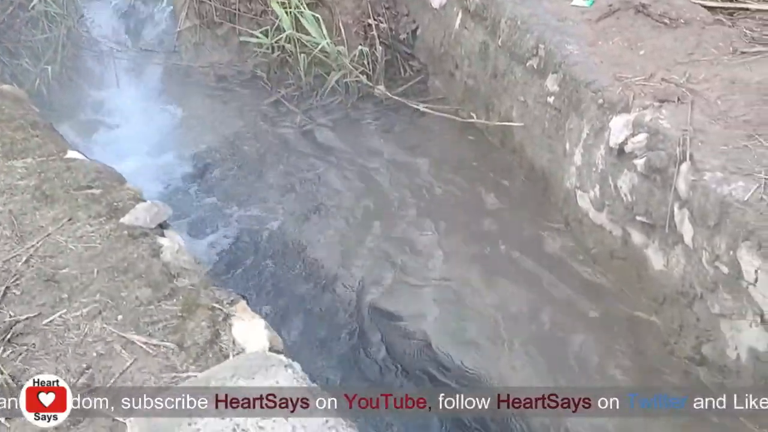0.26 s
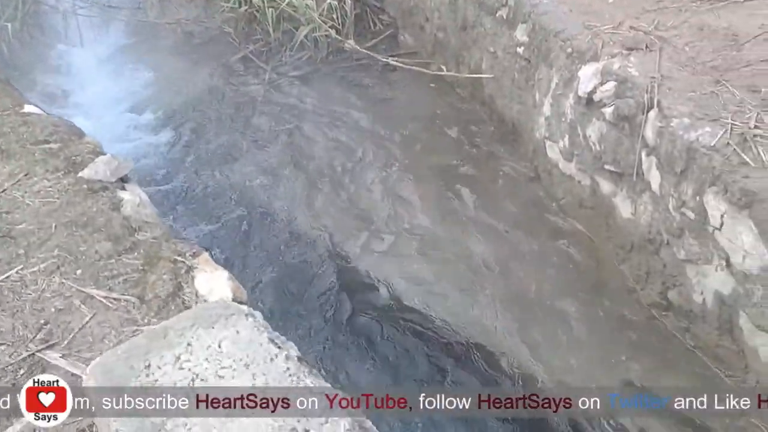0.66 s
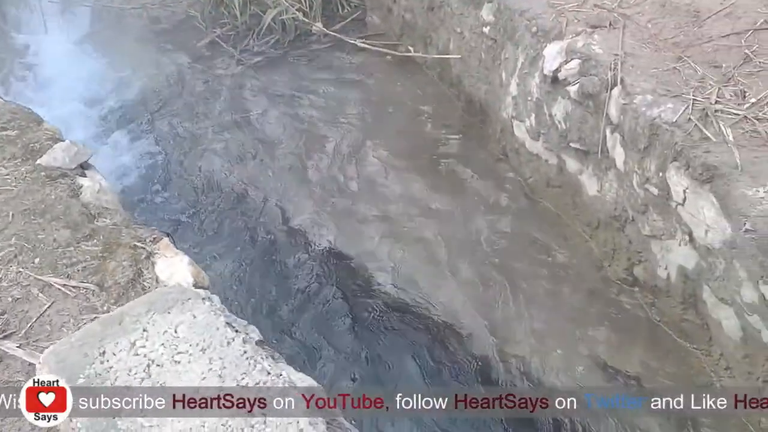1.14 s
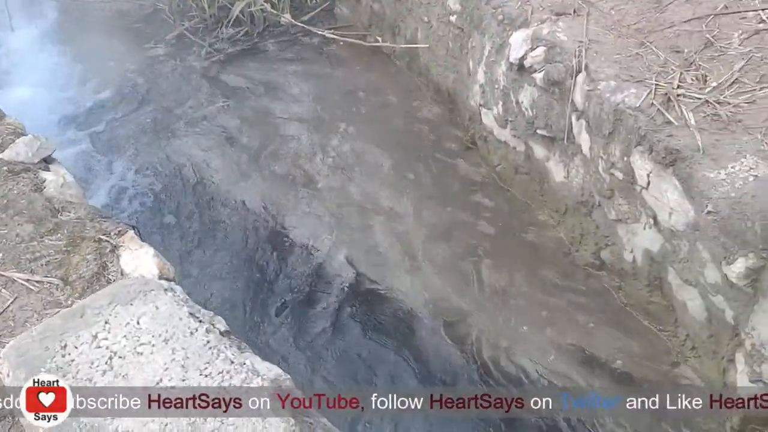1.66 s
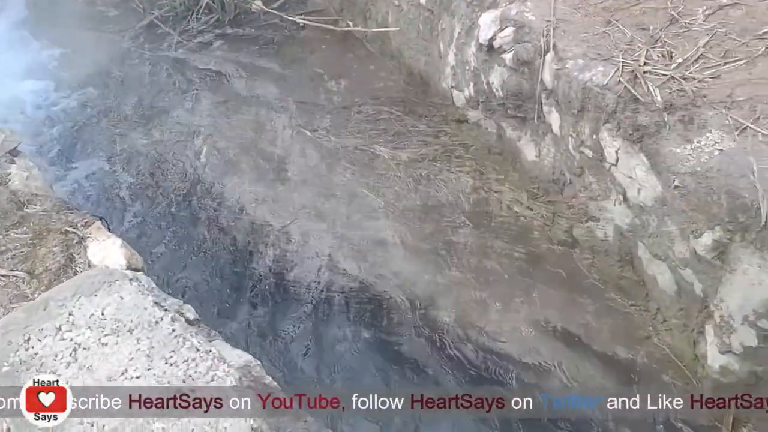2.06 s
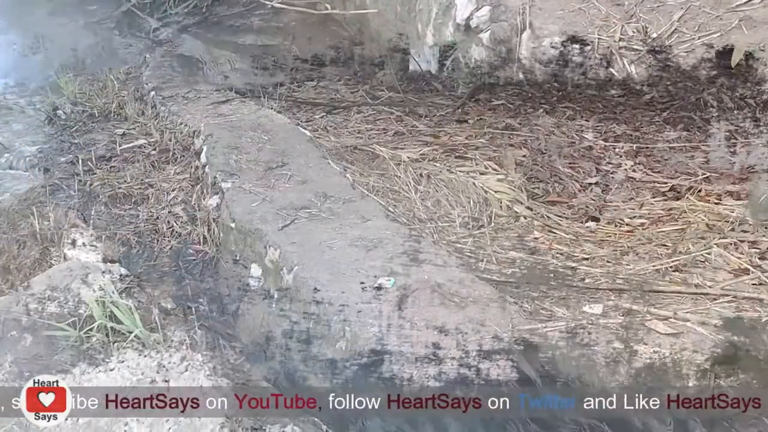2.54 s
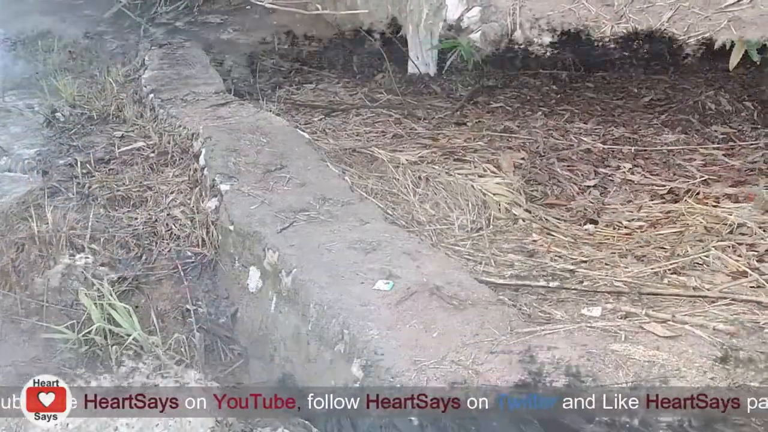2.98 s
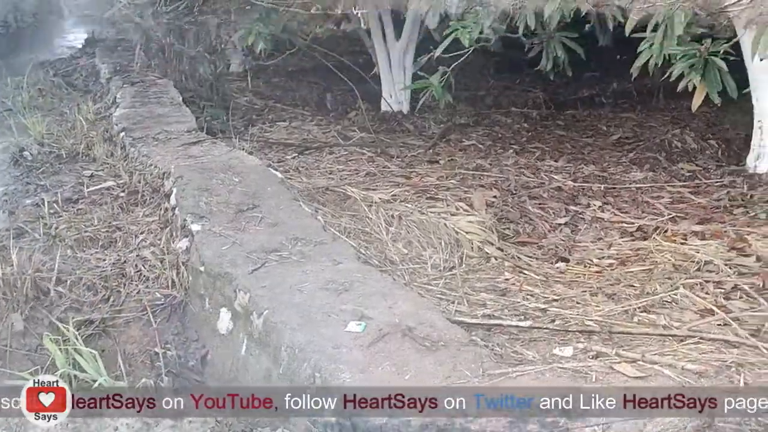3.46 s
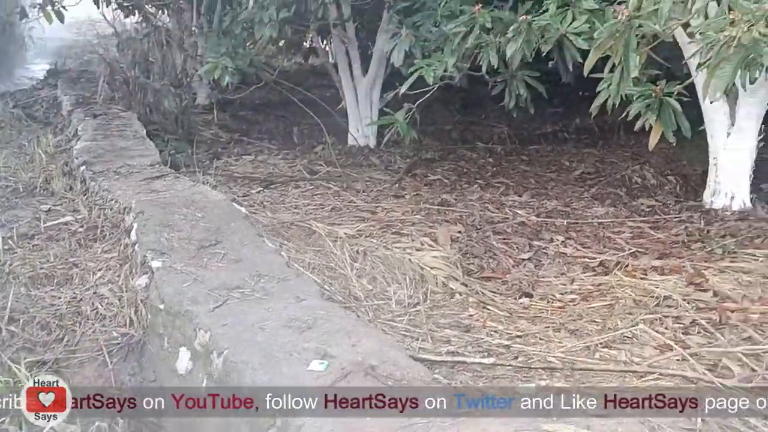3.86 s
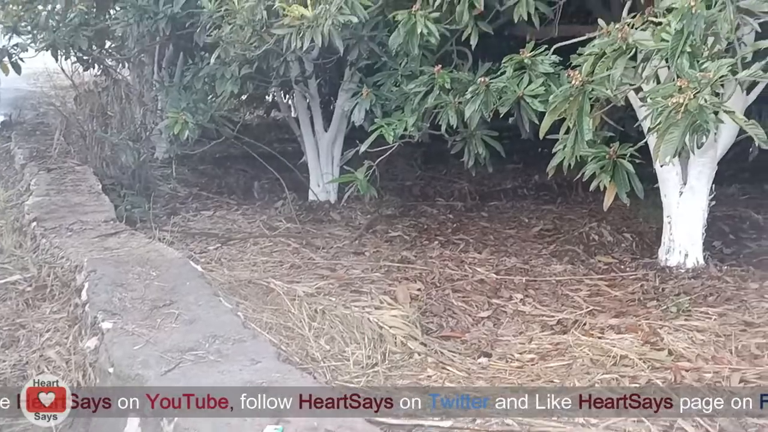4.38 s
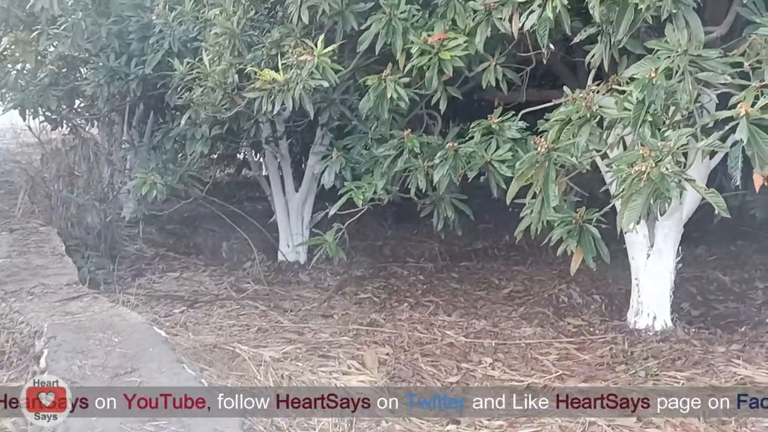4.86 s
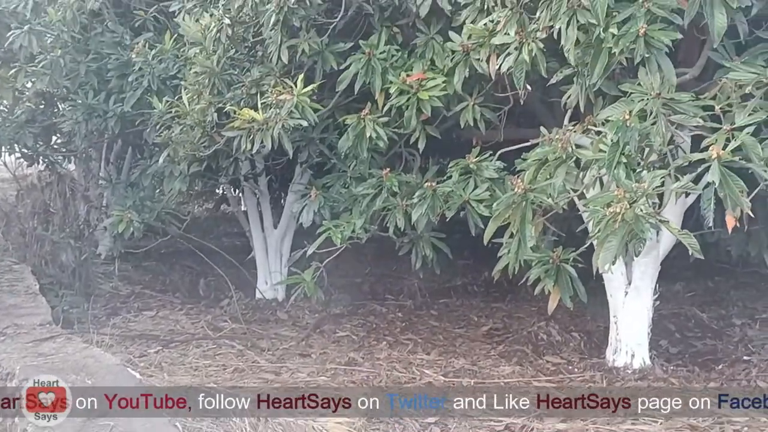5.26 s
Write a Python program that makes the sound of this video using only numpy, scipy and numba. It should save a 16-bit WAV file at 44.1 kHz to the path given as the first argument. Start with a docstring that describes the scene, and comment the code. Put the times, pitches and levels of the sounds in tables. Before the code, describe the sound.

A steady churning stream with bubbling plops and tiny splashes stops dead for a quarter second, then swells up again, slightly duller.

```python
"""Water rushes down a narrow stone channel, first heard from right over it: a churning rush of noise bands,
swarms of ringing bubbles, larger ones plopping out and flung drops ticking. A hard cut brings a short silence.
Then the same stream fades in from the bank, the listener turning away, with plops and ticks as before.
At both places the stone sends back echoes about two milliseconds late, which ripple the colour."""
import sys
import numpy as np
from scipy import signal
from scipy.fft import rfft, irfft
from scipy.io import wavfile
from scipy.ndimage import map_coordinates
from numba import njit

SR = 44100
rng = np.random.default_rng(int(sys.argv[2]) if len(sys.argv) > 2 else 0)


def persist_wave(psi):
    """Save psi, clipped to +-1, as 16-bit WAV."""
    counts = np.round(np.clip(psi, -1, 1) * 32767).astype(np.int16)
    wavfile.write(sys.argv[1], SR, np.atleast_2d(counts).T)


def rack_gain(trim_db):
    """Turn a fader trim in dB into the linear factor to multiply a signal by."""
    fader = np.asarray(trim_db, float)
    return 10 ** (fader / 20)


N = 243873
HZ = np.fft.rfftfreq(N, 1 / SR)
TIME = np.arange(N) / SR


def rms_one(x):
    """Scales a sound to an rms of 1."""
    return x / np.sqrt(np.mean(x ** 2) + 1e-20)


def coloured(x, points):
    """Weights the spectrum by a (f/Hz, level/dB) table; next to nothing passes outside it."""
    hz, db = np.transpose(points)
    weight_db = np.interp(np.log(HZ + 1), np.log(hz), db, left=-80, right=-120)
    return irfft(rfft(x) * rack_gain(weight_db), N)


def between(x, low_hz, high_hz):
    """Band-pass without delay."""
    low_edge = 1 + (low_hz / (HZ + 1)) ** 8
    high_edge = 1 + (HZ / high_hz) ** 8
    return irfft(rfft(x) / low_edge / high_edge, N)


def drift(rate_hz):
    """Slow chance of spread 1: noise twice through a one-pole low-pass at rate_hz."""
    hop = 20  # computed at every 20th sample
    r = np.exp(-2 * np.pi * rate_hz * hop / SR)
    noise = rng.standard_normal(N // hop + 2002)
    slow = signal.lfilter([1], [1, -2 * r, r * r], noise)[2000:]  # settled part only
    return np.interp(np.arange(N) / hop, np.arange(len(slow)), rms_one(slow - slow.mean()))


@njit
def add_bubbles(out, centre_s, height, hz, length_s, phase, rise, sr):
    """A bubble swells and dies, length_s wide at half height; its pitch climbs as it nears the surface."""
    for k in range(len(hz)):
        span = int(2 * length_s[k] * sr)
        first = int(centre_s[k] * sr) - span // 2
        turn = phase[k]
        for i in range(max(0, -first), min(span, len(out) - first)):
            u = i / span
            turn += 2 * np.pi * hz[k] * (1 + rise[k] * (u - .5)) / sr
            out[first + i] += height[k] * np.sin(np.pi * u) ** 2 * np.sin(turn)


def rush(together_db, patchy_db, surge):
    """Churning water: third-octave bands of noise, even per Hz, heaving together and flickering alone."""
    out = np.zeros(N)
    edges = 20 * 2 ** np.arange(0, 9.1, 1 / 3)  # Hz
    white = rng.standard_normal((2, N))
    for k, (low, high) in enumerate(zip(edges, edges[1:])):
        band_pass = signal.butter(2, [low, high], "band", fs=SR, output="sos")
        band = signal.sosfilt(band_pass, white[k % 2])  # neighbours use different noise
        out += band * rack_gain(together_db * surge + patchy_db * drift(25.0))
    return rms_one(out)


def swarm(count, cycles, spread_db, clump, surge):
    """Ringing bubbles, densest at low pitch, crowd into the surges; a few are much louder."""
    draw = rng.random((count, 6))
    crowd = np.cumsum(np.exp(clump * surge))
    when = np.interp(draw[:, 0], crowd / crowd[-1], TIME)
    hz = 150 + 8200 * draw[:, 1] ** 1.5
    length = cycles * (.5 + draw[:, 2]) * (hz / 1000) ** .2 / hz
    loudness = rack_gain(-spread_db * np.log(draw[:, 3] + .012))
    # power per Hz stays about even across bubble sizes
    height = loudness * hz ** (1 / 6) / np.sqrt(length)
    out = np.zeros(N)
    add_bubbles(out, when, height, hz, length, 2 * np.pi * draw[:, 4], 0.33 * draw[:, 5], SR)
    return rms_one(out)


def gurgling(water):
    """The deep bubbles come in uneven bouts: the low band swells and sinks by chance."""
    swell_db, bout_hz = 1.94, 4.2  # spread of the swell, and its pace
    return water + (rack_gain(swell_db * drift(bout_hz)) - 1) * between(water, 280, 680)


def plops():
    """Larger bubbles and sharp drops, each at its own moment and pitch, with shorter droplets around it."""
    # the largest bubbles and loudest ticks, before treble edge and echoes:
    # t/s, peak level/dB, f/Hz, length at half height/ms
    large_bubbles = [(0.295, -44, 400, 11.5), (0.3294, -39.5, 454, 8.7), (0.465, -42, 481, 11),
                     (0.5905, -43, 410, 11.8), (0.5270, -42.5, 503, 8), (0.7218, -40.5, 438, 6.7),
                     (0.757, -44.5, 3067, 11), (0.798, -47.5, 3460, 19), (0.8136, -31.5, 475, 7),
                     (0.8305, -41, 466, 14.7), (0.8805, -35.5, 5700, 1.1), (0.9827, -37, 1810, 2.1),
                     (1.1015, -37, 510, 7), (1.3137, -39.5, 3560, 3.7), (1.3421, -38, 496, 5.6),
                     (1.3842, -37.5, 595, 5.8), (1.477, -38.5, 3550, 8.3), (1.523, -35, 2710, 1.5),
                     (1.6771, -33, 1440, 3.4), (1.7365, -33, 1860, 2.1), (1.863, -33, 3070, 1.3),
                     (1.88, -37, 2870, 1.9), (1.9956, -42.5, 263, 18.9), (2.1424, -52, 130, 22),
                     (2.2552, -32, 1820, 3.2), (2.261, -34, 1700, 3.2), (2.2642, -31, 6500, 0.9),
                     (2.2659, -46.5, 152, 19.4), (2.365, -35.5, 1530, 2.2), (2.3731, -34.5, 448, 6.5),
                     (2.3873, -39, 400, 15.7), (2.776, -39.5, 425, 6.2), (3.182, -41, 3130, 1.3),
                     (3.4049, -48, 450, 19.2), (3.5259, -42.5, 585, 8.4), (3.6033, -33, 1990, 3.9),
                     (3.7447, -37.5, 2520, 1.5), (3.791, -39.5, 1120, 6.6), (3.814, -42, 540, 6.9),
                     (3.8833, -49, 161, 22), (3.9707, -35, 6100, 0.6), (4.0148, -38, 3540, 3),
                     (4.2021, -29, 5600, 0.53), (4.222, -35, 458, 11.7), (4.2567, -40.5, 1190, 7.7),
                     (4.7625, -38, 1070, 2.8), (4.768, -47, 150, 17.5), (4.799, -34, 3420, 1.8),
                     (4.8455, -34.5, 1880, 2.3), (4.8882, -32.5, 342, 4.8), (4.9417, -38, 3120, 3.3),
                     (5.0842, -33, 6500, 1.4), (5.2317, -43, 550, 11.8), (5.3824, -41, 488, 18),
                     (5.3824, -41, 249, 21)]
    splash_db, scatter_octaves = -10, 0.35  # droplets: level relative to their bubble, spread of pitch
    when, peak_db, hz, ms = np.transpose(large_bubbles)
    rise = np.full(len(hz), .08)
    out = np.zeros(N)
    add_bubbles(out, when, rack_gain(peak_db), hz, ms / 1000, 2 * np.pi * rng.random(len(hz)), rise, SR)
    draw = rng.standard_normal((len(hz), 3, 3))  # three droplets to each bubble
    for late, off, phase in draw.transpose(1, 2, 0):
        droplet_s = when + late * ms / 1000
        droplet_hz = np.minimum(hz * 2 ** (scatter_octaves * off), 7500)
        add_bubbles(out, droplet_s, rack_gain(peak_db + splash_db), droplet_hz, ms / 2000,
                    2 * np.pi * phase, rise, SR)
    return out


def middling_plops(count):
    """Middling bubbles and drops at random, a few cycles each, at pitches spread over four octaves."""
    mean_cycles, top_db, range_db = 4.5, -40.5, 10
    draw = rng.random((count, 5))
    hz = 400 * 16 ** draw[:, 1]
    height = rack_gain(top_db - range_db * draw[:, 2])
    length = mean_cycles * (.5 + draw[:, 3]) / hz
    out = np.zeros(N)
    add_bubbles(out, draw[:, 0] * N / SR, height, hz, length, 2 * np.pi * draw[:, 4], np.full(count, .08), SR)
    return out


def ticks(count):
    """Flung drops tick briefly in the treble, at steady pitch."""
    top_db, range_db, mean_ms = -40, 3, 0.7
    draw = rng.random((count, 5))
    height = rack_gain(top_db - range_db * draw[:, 1])
    hz = 4500 + 2300 * draw[:, 2]
    length = mean_ms / 1000 * (.5 + draw[:, 3])
    out = np.zeros(N)
    add_bubbles(out, draw[:, 0] * N / SR, height, hz, length, 2 * np.pi * draw[:, 4], np.zeros(count), SR)
    return out


def echoed(sound, echoes, flow):
    """Stone sends back a band of the sound a few milliseconds late; the lag slides through the shot."""
    shot_s = [flow[0][0], flow[-1][0]]
    for start_ms, end_ms, share, low_hz, high_hz in echoes:
        lag = np.interp(TIME, shot_s, [start_ms, end_ms]) * SR / 1000  # samples
        band = between(sound, low_hz, high_hz)
        sound = sound + share * map_coordinates(band, [np.arange(N) - lag], order=3)
    return sound


def channel(water, colour, echoes, flow, spray_db):
    """One listening place: colour, stone echoes, then body, fizz and spray follow the flow."""
    fizz_hz, spray_hz = 2300, 4600  # where fizz and spray begin
    s, body_db, treble_db = np.transpose(flow)
    spectrum = rfft(echoed(coloured(water, colour), echoes, flow))
    bands = (0, fizz_hz), (fizz_hz, spray_hz), (spray_hz, SR)
    levels = body_db, body_db + treble_db, body_db + treble_db + spray_db
    out = np.zeros(N)
    for (low, high), db in zip(bands, levels):
        part = irfft(spectrum * (HZ >= low) * (HZ < high), N)
        out += rms_one(part) * rack_gain(np.interp(TIME, s, db))
    return out


def scene():
    """The same stream heard from over the channel and from the bank, joined by a cut and a fade."""
    # the flow at each place, ahead of the fade: t/s, body level/dB, treble level over body/dB
    over_flow = [(0, -47, -3.5), (.5, -45.5, -5), (1.2, -46, -3), (1.55, -44.5, -4), (2, -45.5, -2.5),
                 (2.2, -45.5, 0), (2.45, -46.5, -1), (2.6, -48, 0), (2.78, -49, -1)]
    bank_flow = [(3.03, -45.5, -4.5), (3.16, -49, -2.5), (3.2, -44.5, -2.5), (3.45, -45, -3.5),
                 (3.6, -47.5, -2.5), (3.9, -47, -4), (4.5, -45.5, -5), (4.8, -45, -5), (5.53, -45, -5)]
    # colour of the water as sampled at a low rate, relative within each band of the flow:
    # f/Hz, level per Hz/dB
    over_colour = [(25, -10.5), (129, -6), (195, -12.5), (465, -1), (684, -7.5), (1160, -8), (1800, -7.5),
                   (2150, -11), (3130, -5.5), (3900, -9.5), (4900, -19), (6310, -9), (7120, -14),
                   (8030, -31.5), (8700, -65)]
    bank_colour = [(15, -33), (25, -12), (126, -10), (195, -17), (242, -8), (365, -7.5), (488, -3.5),
                   (936, -11), (1670, -7.5), (2180, -8.5), (2520, -11.5), (3620, -8.5), (4390, -20.5),
                   (7120, -16), (8030, -31.5), (8700, -62)]
    # echoes off bed and walls: delay at start/ms, delay at end/ms, share, lowest f/Hz, highest f/Hz
    over_echoes = [(2.146, 2.175, 0.2, 750, 3200), (2.53, 2.5, 0.4, 2060, 2900),
                   (2.308, 2.31, 0.33, 2300, 9300)]
    bank_echoes = [(2.05, 1.707, 0.28, 920, 2740)]
    over_spray_db, bank_spray_db = -4, -5  # spray over fizz
    cut_s, restart_s, fade_from_s, fade_s = 2.7845, 3.031, 3.02, 0.75
    treble_edge_hz = 7100  # of the low-rate sampling, for plops and ticks
    offset = -0.00043  # the converter sits slightly off zero

    surge = rms_one(drift(9.0) + .8 * drift(35.0))
    bubbles = swarm(count=9000, cycles=4.504, spread_db=3.0, clump=.25, surge=surge)
    water = gurgling(rush(0.89, 0.89, surge) + rack_gain(-6.5) * bubbles)

    large = plops()
    small = middling_plops(count=60) + ticks(count=45)
    for _ in range(2):  # twice for a steeper edge
        large, small = between(large, 30, treble_edge_hz), between(small, 30, treble_edge_hz)

    over = channel(water, over_colour, over_echoes, over_flow, over_spray_db) + offset
    over += echoed(large + small, over_echoes, over_flow)
    # the large plops stand outside the fade
    fade = np.clip((TIME - fade_from_s) / fade_s, 0, 1)
    bank = (channel(water, bank_colour, bank_echoes, bank_flow, bank_spray_db) + offset) * fade
    bank += echoed(large + small * fade, bank_echoes, bank_flow)
    return (over * (TIME < cut_s) + bank * (TIME > restart_s))[None]


def low_pass(x):
    """Removes everything above the highest recorded frequency."""
    return signal.sosfilt(signal.butter(12, 15600, fs=SR, output="sos"), x)


def record(dry):
    """As if sampled at a low rate and raised again: a faint mirror stands above the band edge."""
    # what the resampler lets through of the folded sound, itself 6 dB down: f/Hz, level/dB
    mirror_weights = [(8300, -51), (9000, -41.5), (10300, -27.5), (11500, -29), (12600, -60), (14300, -44),
                      (15600, -54.5)]
    low_rate_hz = 16000
    folded = dry[0] * np.cos(2 * np.pi * low_rate_hz * TIME)
    mirror = coloured(folded, mirror_weights)
    sounding = np.abs(dry) > 1e-7  # the silence stays silent
    return low_pass(dry + mirror * sounding)


dry = scene()
out = record(dry)
persist_wave(out)
```